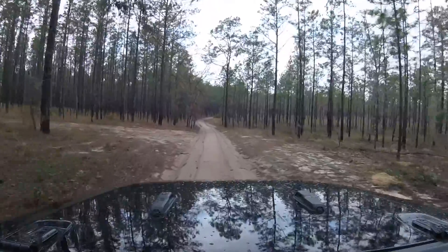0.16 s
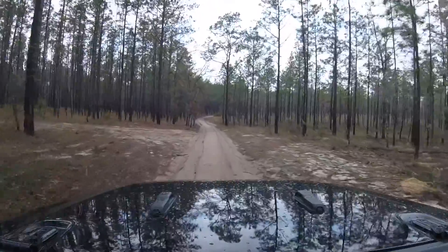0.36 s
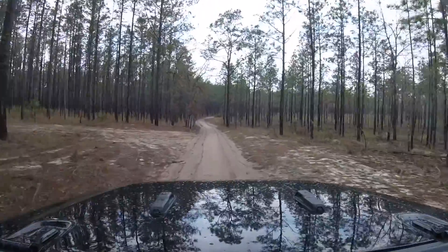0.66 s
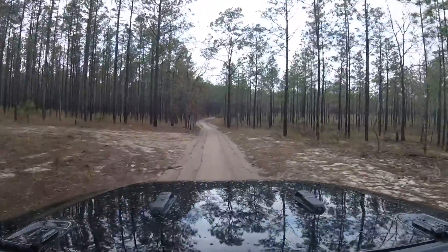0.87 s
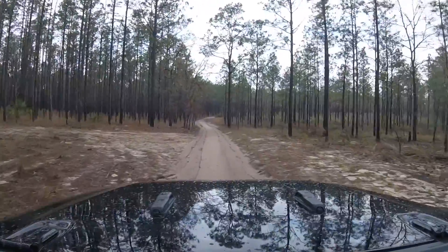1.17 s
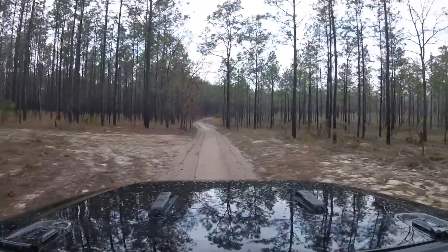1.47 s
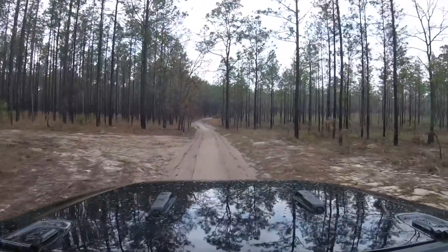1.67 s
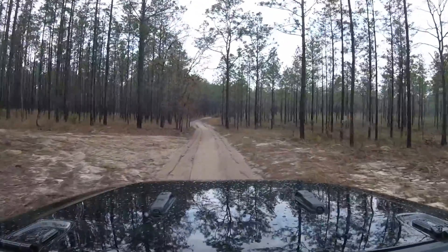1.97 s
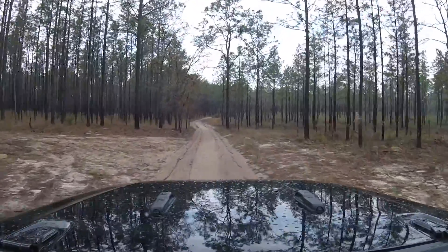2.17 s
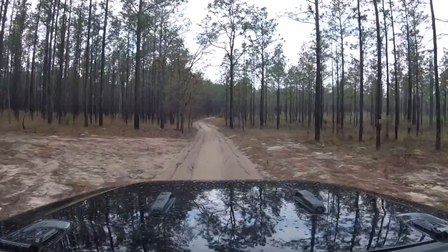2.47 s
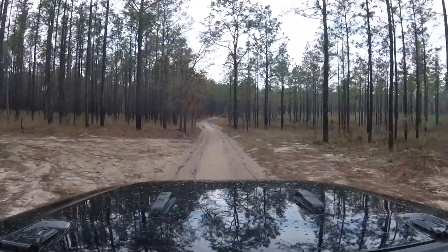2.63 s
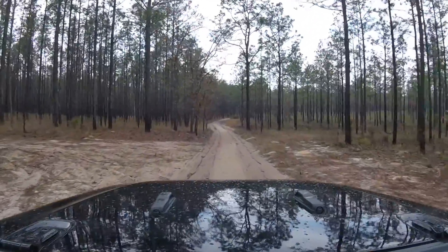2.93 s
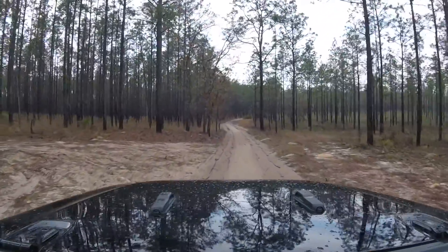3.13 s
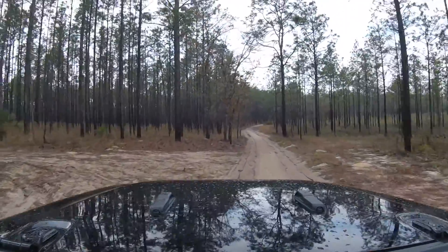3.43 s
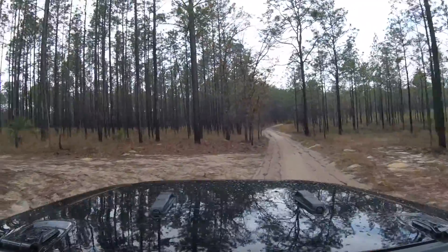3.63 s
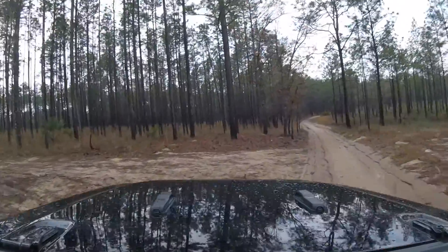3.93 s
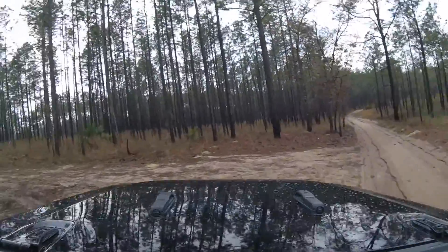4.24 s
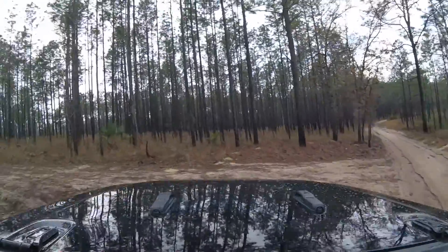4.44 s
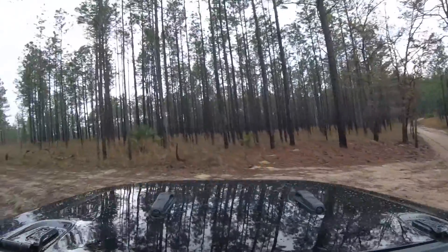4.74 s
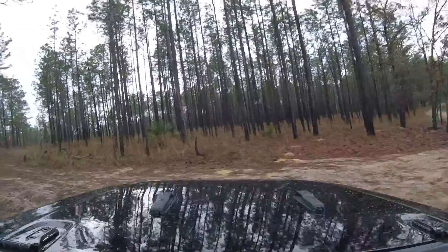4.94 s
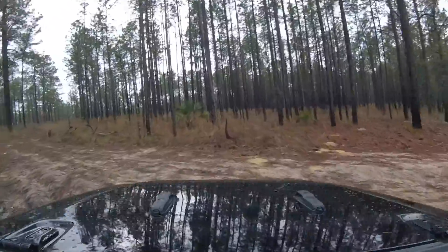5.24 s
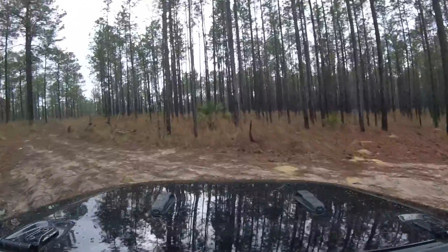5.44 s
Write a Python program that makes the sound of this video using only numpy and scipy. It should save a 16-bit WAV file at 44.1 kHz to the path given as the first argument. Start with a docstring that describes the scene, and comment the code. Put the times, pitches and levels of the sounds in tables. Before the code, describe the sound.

An off-road vehicle crawls along a sandy trail, heard from inside the cab. Its low, booming engine sinks toward idle over a deep body rumble, hissing tyres and a faint, steady rush of air. Loose trim clicks and knocks now and then. Around four seconds in, the wheels cross ruts with a burst of clacks, dull suspension thumps and spraying sand, then the engine takes a little load.

```python
"""A low six-cylinder boom over tyres hissing through sand, heard inside a crawling off-road vehicle.
The engine's orders sweep through the cab's resonances as it sinks to idle; later it takes a little load.
Under a steady rush of air the body swings on its springs and rough ground sets the floor humming.
Loose trim knocks and the suspension thumps, busiest as the wheels cross ruts around four seconds in."""
import sys
import numpy as np
from scipy import signal
from scipy.fft import rfft, irfft
from scipy.io import wavfile

SR = 44100
rng = np.random.default_rng(int(sys.argv[2]) if len(sys.argv) > 2 else 0)


def file_out(sig):
    """Save sig as 16-bit WAV at sys.argv[1]."""
    # one column per channel
    cols = np.atleast_2d(sig).T
    # limit, then scale
    lim = np.clip(cols, -1, 1)
    pcm = np.round(lim * 32767).astype(np.int16)
    wavfile.write(sys.argv[1], SR, pcm)


N = 246947
TIME = np.arange(N) / SR
FREQS = np.fft.rfftfreq(N, 1 / SR)


def amp(db):
    """Decibels to gain."""
    return 10 ** (np.asarray(db) / 20)


def unit(x):
    """Scales to rms 1."""
    return x / np.sqrt(np.mean(x ** 2) + 1e-20)


def curves(table):
    """One automation curve for each column after the time."""
    s, *columns = np.transpose(table)
    return [np.interp(TIME, s, column) for column in columns]


def eq_db(eq, hz):
    """An EQ curve's dB at hz, on a log-frequency axis."""
    f, db = np.transpose(eq)
    return np.interp(np.log(hz + 1), np.log(f + 1), db)


def colour(x, eq):
    """Shapes x with an EQ curve, then scales to rms 1: the curve's levels are relative."""
    return unit(irfft(rfft(x) * amp(eq_db(eq, FREQS)), N))


def noise(eq):
    """Coloured noise at rms 1."""
    return colour(rng.standard_normal(N), eq)


def peak(offset, half_width):
    """A resonance curve: 1 in tune, one half at half_width off."""
    return 1 / (1 + (offset / half_width) ** 2)


def pitched_noise(hz, half_width_hz):
    """Noise through one resonance, at rms 1."""
    return unit(irfft(rfft(rng.standard_normal(N)) * peak(FREQS - hz, half_width_hz), N))


def swell(middle_s, half_length_s):
    """A bell-shaped fade in and out."""
    return np.exp(-((TIME - middle_s) / half_length_s) ** 2)


def drift(hz):
    """Random modulation of rms 1, moving at up to about hz."""
    f = np.fft.rfftfreq(2048, TIME[-1] / 2048)
    slow = irfft(rfft(rng.standard_normal(2048)) * np.exp(-(f / hz) ** 2))
    return np.interp(TIME, np.linspace(0, TIME[-1], 2048), unit(slow))


def ringing(gain):
    """The causal impulse response of a resonator with this gain against frequency."""
    log_gain = np.log(np.concatenate([gain, gain[-2:0:-1]]))
    return np.fft.ifft(np.exp(np.conj(signal.hilbert(log_gain)))).real


def add(mix, s, sound):
    """Mixes a sound in at s seconds."""
    part = mix[max(round(s * SR), 0):][:len(sound)]
    part += sound[:len(part)]


# crank speed, sinking to idle: t/s, speed/(turns per s)
CRANK_SPEED = [(0, 35.3), (.75, 33.6), (1.3, 30.9), (1.8, 28), (2.6, 23.8), (3, 23.7), (3.35, 24.1),
               (4, 23.1), (4.2, 23.8), (4.5, 23), (4.9, 22.7), (5.1, 23), (5.22, 23.6), (5.6, 23.7)]
# how hard the engine labours: t/s, level/dB
ENGINE_LOAD = [(0, -2), (1, 0.5), (2.0, 0), (2.58, -0.5), (2.8, -8), (3.4, -2.5), (3.95, -2.5), (4.2, -2.5),
               (4.42, -0.5), (4.57, 2), (4.72, -0.5), (5.0, 3.5), (5.15, 2.5), (5.3, -1), (5.5, 1)]
# firing, its two overtones and accessory hum: f/crank speed
STRONG_ORDERS = [3, 6, 9, 11]
# cab resonances, one list for each strong order: f/Hz, width/Hz, level/dB
CAB_BOOMS = [
    [(68.52, 2.25, -33), (73.8, 2.2, -42.5), (88.8, 7.5, -41)],
    [(133.4, 16, -53.5), (159.2, 35, -46.5), (179, 12, -60.5)],
    [(258.6, 7.6, -50.5), (243.5, 5.5, -58), (212.6, 5, -56.5)],
    [(267.7, 15, -53.5), (286, 18, -56.5), (307.2, 13.7, -52.5), (350, 8.1, -54.5), (363.2, 18, -53),
     (390.7, 10, -58.5)],
]
# the cab's response to the weaker orders: f/Hz, level/dB
CAB_EQ = [(35, -38), (60, -52.5), (72, -56), (92, -48), (108, -63), (130, -56.5), (180, -59), (225, -63),
          (260, -62.5), (330, -69), (420, -71.5), (505, -66.5), (620, -87), (900, -81)]

def engine(speed, turns, boom_waver_db=1.43, comb_trim_db=-3.0):
    """A few orders boom in the cab, over a wavering comb of half orders from unequal cylinders."""
    out = np.zeros(N)
    load_db, = curves(ENGINE_LOAD)
    for order, resonances in zip(STRONG_ORDERS, CAB_BOOMS):
        boom = sum(amp(db) * peak(order * speed - hz, width / 2) for hz, width, db in resonances)
        strength = boom * amp(load_db + boom_waver_db * drift(7.9))
        out += strength * np.sin(2 * np.pi * (order * turns + rng.random() + 0.019 * drift(2.9)))
    comb_db = comb_trim_db + 0.11 * load_db + 0.29 * (speed - speed.mean())
    for order in np.setdiff1d(np.arange(3, 50) / 2, STRONG_ORDERS):
        strength = amp(eq_db(CAB_EQ, order * speed) + comb_db) * (1 + 0.51 * drift(5.6))
        out += strength * np.sin(2 * np.pi * (order * turns + rng.random() + 0.13 * drift(8.8)))
    return np.sqrt(2) * out


def valves(turns, level_db=-65, decay_firings=1.82):
    """Soft puffs of mechanical chatter, six in every two turns and of unequal strength."""
    cylinder_db = np.array([5.0, 1.5, -33.0, 0.0, -34.0, 2.5])
    eq = [(200, -30), (500, 22.0), (1000, 7.5), (3200, -16), (3800, -4.0), (10000, -53)]
    firings = 3 * turns
    gate = amp(cylinder_db[firings.astype(int) % 6]) * np.exp(-(firings % 1) / decay_firings)
    return amp(level_db) * colour(gate * rng.standard_normal(N), eq)


# soft ruts: middle t/s, length/s, roll boost/dB, spray boost/dB
SOFT_RUTS = [(.2, 0.19, -3, -1), (0.552, 0.22, 2, -4), (1.086, 0.52, 2, -1), (1.697, 0.18, 0.5, -1),
             (3.45, 0.14, 1, 4.5), (3.84, 0.076, 4.5, 1), (4.31, 0.49, 5, 7.5), (4.61, 0.068, 5.5, 3.5),
             (5.256, 0.22, 4.5, 3.5)]

def ruts():
    """Two dB curves: how ploughing through ruts changes the tyre roll and the spray of sand."""
    return sum(np.outer(boosts_db, swell(s, length / 2)) for s, length, *boosts_db in SOFT_RUTS)


# how much the uneven trail rocks the body between bumps: t/s, level/dB
BODY_ROCKING = [(0, -36), (.38, -31.5), (.6, -24), (.92, -23.5), (1.03, -19), (1.09, -31.5), (1.2, -31.5),
                (1.31, -35.5), (1.45, -26), (1.73, -35), (1.85, -31), (2.4, -38.5), (3.8, -35.5),
                (4.1, -36.5), (4.6, -31), (4.95, -34.5), (5.3, -30), (5.6, -30.5)]
# sub-bass that drives the sway: f/Hz, level/dB
RUMBLE_EQ = [(10, -17.5), (22, -10.5), (30, 0.5), (39, 0.5), (48, -7.5), (65, -15), (100, -30),
             (200, -42.5)]
# the body's low drone: f/Hz, level/dB
DRONE_EQ = [(30, -37), (55, 14), (72, 5.5), (91, 13.5), (112, -3.5), (135, 2.5), (170, -5), (260, -13.5),
            (500, -60)]

def body(speed, turns, drone_db=-44.0, mount_hz=33.0, mount_half_width_hz=0.82, lope=0.27, slap=0.1):
    """The body rocks, drones in the ruts, and shakes as the crank passes the resonance of its mounts."""
    in_tune = peak(speed - mount_hz, mount_half_width_hz)
    unbalance = 4 * in_tune * np.exp(2j * np.pi * turns)
    sway = signal.hilbert(noise(RUMBLE_EQ)) + unbalance
    # flatten the envelope so that the trail sets the size of the swing; its timing stays random
    sway = sway.real / (abs(sway) + 0.23)
    sway = colour(sway, [(60, -12.0), (110, -19.5), (220, -51), (1000, -55)])
    # on resonance every other turn shakes harder, and the mounts stiffen on one side
    sway *= 1 + in_tune * lope * np.cos(np.pi * turns)
    sway += in_tune * slap * (sway ** 2 - 1)
    rocking_db = curves(BODY_ROCKING)[0] + 3.5 * drift(12.3) * (1 - 0.77 * in_tune)
    drone = amp(drone_db + ruts()[0]) * noise(DRONE_EQ)
    return amp(rocking_db) * sway + drone


# gritty hiss under the tread: f/Hz, level/dB
SAND_EQ = [(400, -1.5), (900, -2), (1500, 0), (1850, -4.5), (2100, -2.5), (2800, -5), (3300, -4),
           (3650, -15.5), (5200, -21), (10000, -33)]

def sand(grit=0.38, grains_per_s=700, spread_db=4):
    """A fine hiss with separate grains crushed under the tread."""
    grains = (rng.random(N) < grains_per_s / SR) * rng.standard_normal(N)
    grains *= amp(spread_db * np.minimum(rng.exponential(1, N), 3))
    return colour(rng.standard_normal(N) + grit * unit(grains), SAND_EQ)


# how hard the tyres work the sand, easing as the vehicle slows: t/s, level/dB
TREAD_EFFORT = [(0, 0.5), (.5, 1), (1.8, -2.5), (2.8, -3.5), (3.9, -2.5), (4.9, -4), (5.6, -2)]
# low-mid roll of the tyres: f/Hz, level/dB
ROLL_EQ = [(90, -25), (160, -11.5), (290, 3), (400, -7), (510, -8), (680, -12), (800, -9.5), (1100, -16),
           (2500, -69)]
# bright sizzle of flying sand: f/Hz, level/dB
SPRAY_EQ = [(2500, -31), (3700, -0.5), (5200, 6.5), (6200, 2.5), (8000, -7.5), (10000, -13), (14000, -42)]

def tyres(roll_db=-54, sand_db=-56.5, spray_db=-70.0):
    """The tyres roll through uneven sand and throw up a fine spray; both swell in the deeper ruts."""
    effort_db, = curves(TREAD_EFFORT)
    rut_roll_db, rut_spray_db = ruts()
    crunch_db = 0.73 * drift(24)
    roll_gain = amp(roll_db + 0.85 * effort_db + rut_roll_db + 1.2 * drift(24))
    sand_gain = amp(sand_db + effort_db + 0.34 * rut_spray_db + crunch_db)
    spray_gain = amp(spray_db + 1.5 * effort_db + rut_spray_db + crunch_db + 1.55 * drift(11))
    return roll_gain * noise(ROLL_EQ) + sand_gain * sand() + spray_gain * noise(SPRAY_EQ)


# airy bed in the cab: f/Hz, level/dB
AIR_EQ = [(500, 6.5), (3200, -14), (3800, -9), (5200, -4), (6100, -4), (6500, 8.5), (7100, 0.5),
          (8000, -0.5), (9300, -3.5), (10300, -14), (11800, -8.5), (13000, -12), (14300, -44)]

def air(rush_db=-67, whistle_db=-79):
    """A steady rush of air with a fuzzy high whistle."""
    whistle = pitched_noise(hz=6510, half_width_hz=170)
    return amp(rush_db) * noise(AIR_EQ) + amp(whistle_db) * whistle


# patches of rough ground: middle t/s, length/s, f/Hz, level/dB
ROUGH_PATCHES = [(0.194, 0.27, 262, -51), (0.2, 0.3, 92, -42.5), (1.042, 0.14, 135, -47.5),
                 (3.4, 0.36, 94, -41.5), (3.447, 1, 216, -56), (3.846, 0.058, 510, -50.5),
                 (3.87, 0.33, 99, -42), (4.276, 0.17, 246, -51), (5.266, 0.34, 255, -46.5)]

def floor_hum():
    """The floor hums hollowly while the wheels scrub over rough ground."""
    return sum(amp(db) * swell(s, length / 2) * pitched_noise(hz, half_width_hz=32)
               for s, length, hz, db in ROUGH_PATCHES)


# sub-bass bumps in the trail: middle t/s, level/dB, half length/s, f/Hz
TRAIL_BUMPS = [(0.087, -24.5, 0.048, 34), (0.204, -22.5, 0.019, 40.6), (0.314, -22, 0.021, 36.26),
               (1.146, -25, 0.056, 33), (1.391, -21.5, 0.041, 35), (1.554, -30, 0.028, 36),
               (1.666, -25, 0.039, 38), (2.12, -25.5, 0.026, 34), (2.326, -30.5, .04, 33),
               (2.423, -31, .02, 43.6), (2.57, -28.5, .03, 44), (2.702, -32, 0.032, 38.05),
               (2.882, -31, .03, 31.7), (3.513, -32, 0.021, 36.9), (3.803, -30, 0.023, 36.1),
               (4.246, -26.5, 0.046, 32.9), (4.505, -27, 0.049, 39), (5.46, -26.5, .05, 39.88)]

def bumps():
    """Each bump swings the body on its springs for a few cycles."""
    out = np.zeros(N)
    for s, db, half_length, hz in TRAIL_BUMPS:
        swing = np.sqrt(2) * np.sin(2 * np.pi * (hz * TIME + rng.random()))
        out += amp(db) * swell(s, half_length) * swing
    return out


# modes of the trim panel: f/Hz, width/Hz, level/dB
PANEL_MODES = [(507, 230, 11.5), (600, 47, 12), (753, 51, 13), (1006, 28, 4), (1116, 48, 10.5),
               (1440, 150, 4.5), (2100, 1400, 0), (2900, 400, -19), (4700, 140, -14), (5670, 300, -12.5),
               (6500, 180, -5.5), (9400, 880, -16)]
# loose trim hits: t/s, thud level/dB, clack level/dB, tick level/dB, chatter t60/s,
# strike/chatter ratio, low note f/Hz, high note f/Hz
TRIM_HITS = [(0.153, -52, -56, -68, .019, .3, 800, 1600), (0.319, -76, -66, -67, .04, .2, 4300, 5600),
             (1.597, -76, -68, -66, .035, .3, 3940, 5200),
             (1.906, -62, -54.5, -62, 0.033, 0.57, 1780, 3900),
             (1.915, -53, -61, -69, 0.024, 0.47, 920, 1850), (2.127, -80, -76, -65, 0.017, .2, 3450, 5500),
             (2.14, -75, -70, -55.5, 0.046, 0.24, 3340, 5830),
             (2.374, -63, -58.5, -71, 0.027, .6, 1500, 1900),
             (2.751, -75, -60, -84, 0.044, 0.4, 1480, 1560), (3.425, -63, -73, -64, 0.15, .1, 3200, 5840),
             (3.477, -76, -57, -82, .025, 0.65, 1160, 1850), (3.493, -73, -63, -80, .03, .4, 1190, 2110),
             (3.5427, -62, -55.5, -68, 0.026, 1, 1210, 1320),
             (3.9185, -53, -49.5, -51.5, 0.03, 0.45, 2180, 4640),
             (3.9245, -53, -53.5, -61, 0.073, 0.2, 2950, 7600),
             (3.9515, -48.5, -52, -64, 0.024, 0.59, 724, 1290),
             (3.998, -60, -53.5, -67, 0.06, .1, 2250, 2600),
             (4.004, -54, -60, -62.5, 0.045, .4, 5430, 7200),
             (4.0895, -47, -53.5, -64.5, 0.034, 0.52, 706, 1310),
             (4.162, -56, -54, -72, .03, 0.46, 1490, 1700),
             (4.1757, -37, -47.5, -61.5, 0.032, 1.3, 620, 1450),
             (4.181, -52, -53.5, -67, 0.044, 0.27, 1150, 1500),
             (4.231, -74, -63, -58, 0.091, .05, 4870, 5230), (4.242, -62, -61, -61, 0.07, .15, 1310, 5400),
             (4.4331, -66, -54.5, -58, 0.048, .05, 2800, 3600),
             (4.438, -66, -52, -66, 0.031, .1, 1480, 3120), (4.547, -74, -61, -60.5, 0.064, .1, 4870, 7040),
             (4.616, -62, -57, -67, .088, .1, 885, 1210), (5.13, -59, -54, -77, 0.073, .1, 1430, 1590),
             (5.202, -53.5, -57.5, -66, 0.13, .1, 2150, 5500)]

def trim_knocks(cab_db=-26, cab_t60=0.33, note_db=10, size=8192):
    """A strike and brief chatter ring two notes of a loose piece and its panel, then fade in the cab."""
    t, hz = np.arange(size) / SR, np.fft.rfftfreq(size, 1 / SR)
    panel = np.sqrt(sum(amp(db) ** 2 * peak(hz - f, width / 2) for f, width, db in PANEL_MODES))
    bands_hz = [(450, 950), (950, 3500), (3300, 9500)]  # thud, clack, tick
    out = np.zeros(N)
    for s, *levels_db, t60, strike, low_hz, high_hz in TRIM_HITS:
        decay = amp(-60 * t / t60) + amp(cab_db - 60 * t / cab_t60)
        contacts = rng.standard_normal(size) * decay
        contacts[0] = strike * np.linalg.norm(contacts)
        notes = sum(peak(hz - note, 0.092 * max(note, 1500)) for note in (low_hz, high_hz))
        response = ringing(panel * (1 + amp(note_db) * notes))
        ring = signal.fftconvolve(contacts, response)[:size]
        for band, db in zip(bands_hz, levels_db):
            part = signal.sosfilt(signal.butter(3, band, "bandpass", fs=SR, output="sos"), ring)
            add(out, s, amp(db) * part / np.std(part[:SR // 50]))  # the first 20 ms set the level
    return out


# suspension hits: t/s, level/dB, t60/s, low note f/Hz, high note f/Hz
SUSPENSION_HITS = [(1.904, -51.5, 0.31, 238, 385), (3.536, -44.5, 0.11, 228, 347),
                   (3.952, -47, 0.16, 303, 399), (4.174, -45.5, 0.12, 293, 403),
                   (4.239, -43, 0.16, 268, 355), (4.434, -41, 0.097, 290, 360)]
# dull weight of each blow: f/Hz, level/dB
THUMP_EQ = [(120, -5), (240, -2), (290, -1), (355, -7.5), (440, -8.5), (700, -30), (1500, -72)]

def suspension_thumps(rise_s=0.0023, note_db=2):
    """Dull blows from the suspension, each leaving two short hollow notes in the floor."""
    t, out = np.arange(SR // 2) / SR, np.zeros(N)
    for s, db, t60, *notes_hz in SUSPENSION_HITS:
        notes = amp(note_db) * sum(np.sin(2 * np.pi * hz * t) for hz in notes_hz)
        envelope = (1 - np.exp(-t / rise_s)) * amp(-60 * t / t60)
        blow = (noise(THUMP_EQ)[:len(t)] + notes) * envelope
        add(out, s, amp(db) * blow / np.std(blow[:SR // 25]))  # the first 40 ms set the level
    return out


def scene():
    """The mono mix in the cab; one crank drives the engine, the valves and the body's shake."""
    speed, = curves(CRANK_SPEED)
    turns = np.cumsum(speed) / SR
    motor = engine(speed, turns) + valves(turns)
    ride = body(speed, turns) + bumps() + tyres() + floor_hum()
    return (motor + ride + air() + suspension_thumps() + trim_knocks())[None]


def record(dry, cutoff_hz=14100):
    """A steep low-pass takes off the very top."""
    lowpass = signal.firwin(511, cutoff_hz, window=("kaiser", 9), fs=SR)
    return signal.oaconvolve(dry, lowpass[None], "same")


dry = scene()
out = record(dry)
file_out(out)
```